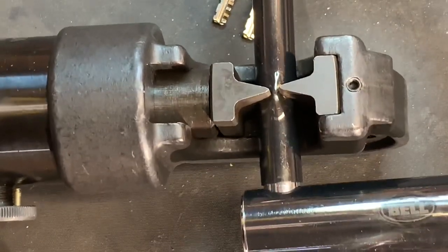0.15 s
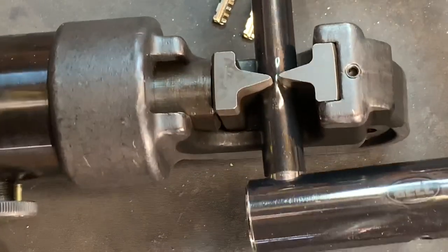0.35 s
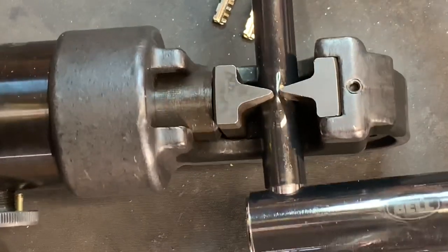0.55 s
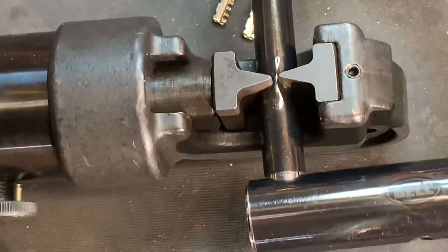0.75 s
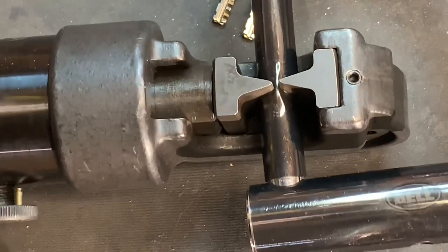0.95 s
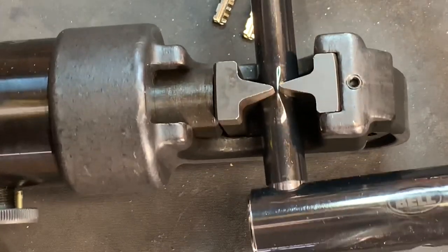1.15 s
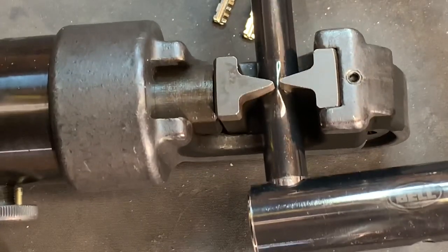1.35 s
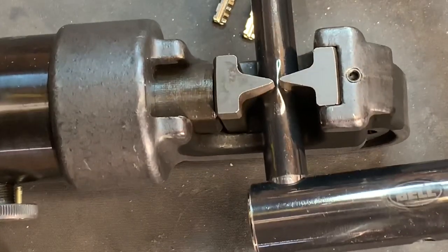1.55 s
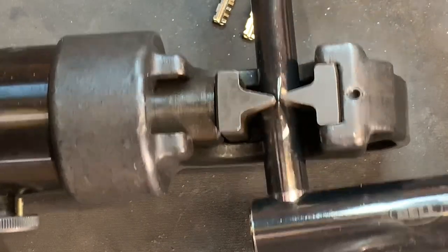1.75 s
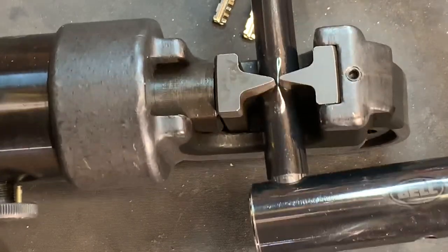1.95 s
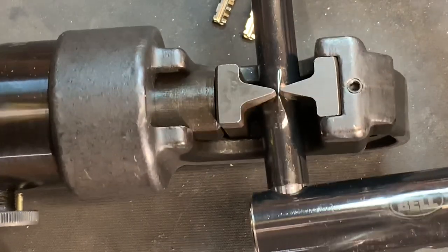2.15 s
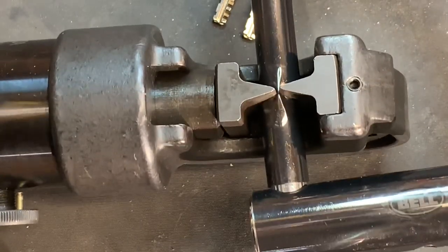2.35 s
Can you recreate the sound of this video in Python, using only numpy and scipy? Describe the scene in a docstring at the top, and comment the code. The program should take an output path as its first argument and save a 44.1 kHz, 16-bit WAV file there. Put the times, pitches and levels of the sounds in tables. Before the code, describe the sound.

Close at a garage workbench, a pump handle clicks, steel chinks, and a deafening crack overloads the microphone; metal rings, the room answers roughly, then two quieter strokes end in solid knocks over faint hum.

```python
"""Faint hum and a small tick, then the click of a pump handle, heard close by at a garage workbench.
A hand-pumped hydraulic cutter bites a hardened steel shackle: the steel chinks, then cracks loudly enough
to overload the microphone, and the bench jolts. Two more strokes follow, each ending in a knock.
Struck metal and the bench are sums of dying sine modes; clacks, blast and thuds are noise bursts whose
bands die at their own speeds; oil, rubbing, air and rumble are steadily coloured noise."""
import sys
import numpy as np
from scipy import signal
from scipy.fft import rfft, irfft
from scipy.io import wavfile

SR = 44100
rng = np.random.default_rng(int(sys.argv[2]) if len(sys.argv) > 2 else 0)


def transcribe(signal):
    """Save signal, clipped to [-1, 1], as a 16-bit WAV file at the path in sys.argv[1]."""
    frames = np.atleast_2d(signal).T
    limited = np.clip(frames, -1, 1)
    pcm = np.round(limited * 32767).astype(np.int16)
    wavfile.write(sys.argv[1], SR, pcm)


N = 105840  # samples, 2.4 s

# The handle lands at the end of a stroke: start_s, level_db
KNOCKS = [(1.0275, -3), (1.7311, -1.5)]
CRACK_S = 0.2311  # the shackle breaks


def amp(db):
    """Decibels to gain."""
    return 10 ** (np.asarray(db) / 20)


def add(mix, s, sound):
    """Lays a sound into the mix at time s, in place."""
    part = mix[max(round(s * SR), 0):][:len(sound)]
    part += sound[:len(part)]


def read(points, hz, column=1):
    """Reads a table on a log-frequency axis."""
    rows = np.array(points, float)
    return np.interp(np.log(hz + 1), np.log(rows[:, 0]), rows[:, column])


def decay(t, t60):
    """A gain that falls by 60 dB in t60 seconds."""
    return np.exp(-np.log(1000) * t / t60)


def rise(rise_s):
    """One second of gain that climbs from 0 towards 1 with the given time constant."""
    return 1 - np.exp(-np.arange(SR) / SR / rise_s)


def noise(colour):
    """Steady noise of a given colour, rms 1."""
    gain = amp(read(colour, np.fft.rfftfreq(N, 1 / SR)))
    x = irfft(rfft(rng.standard_normal(N)) * gain, N)
    return x / x.std()


def waver(rate_hz, depth_db):
    """A gain that wanders at random, mostly slower than the given rate."""
    smoothing = (1 + (np.fft.rfftfreq(N, 1 / SR) / rate_hz) ** 2) ** 2
    x = irfft(rfft(rng.standard_normal(N)) / smoothing, N)
    return amp(depth_db * x / x.std())


def burst(colour, rise_cycles=0.85, count=24):
    """One second of noise, rms 1 before shaping: each band swells in about a cycle and dies at its own speed."""
    t, hz = np.arange(SR) / SR, np.fft.rfftfreq(SR, 1 / SR)
    spectrum = np.exp(2j * np.pi * rng.random(len(hz))) * amp(read(colour, hz))
    spectrum /= irfft(spectrum, SR).std()
    centres = np.geomspace(30, 16000, count)
    # triangular bands that overlap and sum to one
    weights = np.array([np.interp(hz, centres, row) for row in np.eye(count)])
    bands = irfft(spectrum * weights, SR)
    swell = 1 - np.exp(-t * centres[:, None] / rise_cycles)
    fade = decay(t, read(colour, centres, column=2)[:, None])
    return (bands * swell * fade).sum(0)


def ring(modes, scatter=1):
    """One second of dying modes; scatter 0 starts them all together, as one push does."""
    t = np.arange(SR) / SR
    return sum(amp(db) * decay(t, t60) * np.sin(2 * np.pi * (hz * t + scatter * rng.random()))
               for hz, db, t60 in modes)


def shimmer(modes, spread, count=12):
    """Each mode split into a cluster of close, beating lines; spread is a share of its frequency."""
    lines = [(hz * (1 + spread * rng.standard_normal()), db, t60)
             for hz, db, t60 in modes for _ in range(count)]
    return ring(lines) / np.sqrt(count)


def push(modes, rise_s):
    """Low modes set swinging by a soft push."""
    return -ring(modes, scatter=0) * rise(rise_s)


def garage(x, wet_db):
    """Adds the short tail of the room: the sound convolved with dying noise of unit energy."""
    # Room tail: pitch_hz, relative_level_db, t60_s
    room = [(160, -7.5, 0.26), (500, 2, 0.45), (4500, -9.5, 0.42), (15000, -12.5, 0.45)]
    tail = burst(room) * rise(0.0021)
    return x + amp(wet_db) * signal.fftconvolve(x, tail / np.linalg.norm(tail))[:N]


def background():
    """Room air and low rumble as coloured noise, and mains hum as sines whose levels waver."""
    # Colours of the air and of the rumble: pitch_hz, relative_level_db
    air_colour = [(88, -20), (150, -4.5), (360, -4), (473, -6), (600, -12), (1820, -20.5), (6440, -22),
                  (15800, -33.5)]
    rumble_colour = [(10, 3), (25, 4.5), (50, -9), (80, -15), (130, -19.5), (220, -37), (600, -59.5)]
    # Course of the rumble's rms: time_s, level_db
    rumble_course = [(0, -36), (.12, -31.5), (.6, -41), (2.3, -44.5)]
    # Mains hum, rms before it wavers: pitch_hz, level_db
    hum_lines = [(119.6, -65.5), (360, -70.5), (480, -73.5), (600, -75.5), (721, -83)]
    t = np.arange(N) / SR
    air = amp(-61.5) * noise(air_colour)
    rumble = amp(np.interp(t, *np.transpose(rumble_course))) * noise(rumble_colour)
    hum = np.zeros(N)
    for hz, db in hum_lines:
        sine = np.sqrt(2) * np.sin(2 * np.pi * (hz * t + rng.random()))
        hum += amp(db) * waver(rate_hz=9, depth_db=4.5) * sine
    return air + rumble + hum


def rubbing():
    """Faint friction as the handle is moved: coloured noise under a bell-shaped swell."""
    # Rubs: middle_s, half_length_s, peak_level_db
    rubs = [(2.337, 0.12, -60)]
    # Colour of the friction: pitch_hz, relative_level_db
    rub_colour = [(400, 8.5), (1000, 4.5), (15500, -8.5)]
    t = np.arange(N) / SR
    swells = sum(amp(db) * np.exp(-((t - s) / half) ** 2) for s, half, db in rubs)
    return noise(rub_colour) * swells


def oil(edge_s=0.0075):
    """Oil hisses through the valve while the handle comes down: noise with short sloping edges."""
    # Hisses: start_s, length_s, level_db
    hisses = [(0.122, 0.088, -54.5), (0.954, 0.08, -58), (1.676, 0.075, -59.5)]
    # Colour of the hiss: pitch_hz, relative_level_db
    hiss_colour = [(300, -15), (2800, 4.5), (4600, 3), (6000, -4), (10000, -22), (15500, -13.5)]
    t = np.arange(N) / SR
    flow = np.zeros(N)
    for s, length, db in hisses:
        to_nearest_edge = np.minimum(t - s, s + length - t)
        flow += amp(db) * np.clip(to_nearest_edge / edge_s, 0, 1)
    return noise(hiss_colour) * flow


def loose_metal():
    """A loose piece hops on the bench after each jolt; its ring builds up unevenly as it chatters."""
    # Rattles: start_s, tap_db, ring_db
    rattles = [(.286, -29, -9.5), (1.0755, -24.5, -37), (1.088, -35, -37.5), (1.7785, -27.5, -40),
               (1.790, -34, -39.5)]
    # Noise of the tap: pitch_hz, relative_level_db, t60_s
    tap_colour = [(372, 6.5, 0.11), (680, -2.5, 0.12), (1100, -9.5, 0.11), (1600, -19.5, .14),
                  (2527, -19.5, 0.11), (12000, -42.5, 0.06)]
    # Modes of the loose piece: pitch_hz, relative_level_db, t60_s
    loose_modes = [(1168, 0, .22), (1200, -8, .12), (1286, -13, .16), (2053, -21, .16)]
    out = np.zeros(N)
    swell = rise(0.04)
    for s, tap_db, ring_db in rattles:
        chatter = waver(rate_hz=150, depth_db=1.8)[:SR]
        tap = amp(tap_db) * burst(tap_colour, rise_cycles=0.3)
        add(out, s, tap + amp(ring_db) * swell * chatter * ring(loose_modes))
    return garage(out, wet_db=-24)


def bench(lag_s=0.00097, sway_lag_s=0.0045, rebound_s=0.128):
    """The bench thumps under each knock and the tool's kick; its frame sways and settles back."""
    # Modes of the bench and of its swaying frame: pitch_hz, relative_level_db, t60_s
    bench_modes = [(114.6, -5, 0.11), (116, -30.5, 0.51), (224, -27, 0.38), (342, -38.5, .3),
                   (392, -37, 0.33)]
    sway_modes = [(43, -10.5, .12), (46.7, -28, 0.66)]
    # Noise of the thud: pitch_hz, relative_level_db, t60_s
    thud_colour = [(40, -1, 0.41), (123.4, 5, 0.31), (450, -5, 0.16), (620, -16.5, .23), (970, -12.5, 0.19),
                   (1400, -29, 0.15), (8000, -57, .1)]
    out = np.zeros(N)
    swing = push(bench_modes, rise_s=0.0044)
    sway = push(sway_modes, rise_s=0.002)
    add(swing, sway_lag_s, -sway)
    add(swing, rebound_s, amp(-13.5) * sway)
    # the tool kicks at once as the steel breaks, then drops back on the bench
    jolts = [(CRACK_S, -5), (CRACK_S + 0.0225, 6.5)]
    for s, db in KNOCKS + jolts:
        add(out, s + lag_s, amp(db) * (swing + amp(-19.5) * burst(thud_colour)))
    return out


def handle():
    """The handle clicks and bumps at the top, ticks in its joints and knocks at the bottom."""
    # Handle at the top of its travel: click_s, click_db, bench_bump_s, bump_db
    lifts = [(0.0466, -30, .0575, -20), (0.863, -30.5, .871, -22.5), (1.5616, -28, 1.5683, -21.5)]
    # Small ticks of play in the linkage: start_s, level_db
    ticks = [(.033, -50), (.558, -51), (.6024, -51), (0.843, -50), (1.3675, -49), (1.5397, -49)]
    # Noise of click, tick and clack: pitch_hz, relative_level_db, t60_s
    click_colour = [(800, -1.5, 0.028), (1300, -9, 0.062), (3000, -2, .04), (5500, -8.5, 0.044),
                    (8000, -1, .03), (15500, -12, 0.027)]
    tick_colour = [(1210, -3.5, .03), (4460, 0, .04), (14875, -25.5, .02)]
    clack_colour = [(830, 12.5, 0.035), (1520, -4.5, 0.23), (2430, 9, 0.016), (4870, -3, 0.092),
                    (5900, -5, 0.18), (10400, -3, 0.03), (15500, -24, .015)]
    # Modes of linkage, bench bump and end stop: pitch_hz, relative_level_db, t60_s
    linkage_modes = [(3073, -5.5, 0.057), (7913, -10.5, 0.021), (790, -15, 0.047)]
    bump_modes = [(115.74, 3, 0.08), (145, 1, 0.096)]
    stop_modes = [(2596, 2.5, 0.028), (4540, -0.5, 0.014), (5140, -4.5, 0.041)]
    out = np.zeros(N)
    for s, click_db, bump_s, bump_db in lifts:
        add(out, s, amp(click_db) * (burst(click_colour) + ring(linkage_modes)))
        add(out, bump_s, amp(bump_db) * push(bump_modes, rise_s=0.0036))
    for s, db in ticks:
        add(out, s, amp(db) * burst(tick_colour))
    for s, db in KNOCKS:
        add(out, s, amp(db - 29.5) * (burst(clack_colour) + ring(stop_modes)))
    return garage(out, wet_db=-11.5)


def chinks(rise_s=0.0012, high_ring_from_hz=8500):
    """Steel slips on steel and rings; the contact favours low modes, or high modes and a bright skid."""
    # Shifts of the steel: start_s, low_ring_db, high_ring_db, contact_noise_db
    shifts = [(0.0681, -30, -25, -28.5), (0.0857, -35, -17, -28.5), (0.1081, -27.5, -21.5, -22.5),
              (0.444, -48.5, -42.5, -44.5), (.6612, -67, -47.5, -69.5), (0.878, -36.5, -52, -34.5),
              (0.935, -60.5, -50, -55), (1.043, -65, -34.5, -42), (1.058, -68, -42, -50),
              (1.743, -56, -33, -37.5), (1.8505, -74, -54.5, -57.5)]
    # Modes of the steel parts: pitch_hz, relative_level_db, t60_s
    steel_modes = [(2848, -16, .25), (5130, -16, .17), (7235, -1, .15), (10030, -2.5, .055),
                   (11720, -12, .06), (12480, -14, .07), (15200, -9, .05)]
    # Noise of the contact and of the skid: pitch_hz, relative_level_db, t60_s
    contact_colour = [(1490, -6, .06), (3200, 1.5, 0.058), (5060, -4.5, 0.064), (5860, -10.5, .05),
                      (7900, -13, 0.1), (15500, -15, .03)]
    skid_colour = [(4000, -30, .03), (9000, -1.5, .04), (11500, -2, 0.1), (13800, -7, .04), (15500, 1, .04)]
    out = np.zeros(N)
    swell = rise(rise_s)
    for s, low_db, high_db, contact_db in shifts:
        modes = [(hz, db + (high_db if hz > high_ring_from_hz else low_db), t60)
                 for hz, db, t60 in steel_modes]
        contact = amp(contact_db) * burst(contact_colour)
        skid = amp(high_db - 6.5) * burst(skid_colour)
        add(out, s, swell * (shimmer(modes, spread=0.007) + contact + skid))
    return garage(out, wet_db=-13)


def crack():
    """The shackle fractures: a blast, ringing steel and the room's rough answer."""
    # Noise of the blast and of the room's answer: pitch_hz, relative_level_db, t60_s
    blast_colour = [(100, -3.5, .1), (1000, -6.5, 0.16), (4000, 5, .11), (5500, -2.5, 0.12),
                    (7500, 4, 0.078), (10000, 0, .1), (16600, -8.5, 0.056)]
    answer_colour = [(100, 6.5, .5), (270, -2.5, 0.45), (480, 4, .39), (1500, -4.5, .41),
                     (4000, -1.5, .385), (5570, -5, 0.4), (8000, -2.5, 0.26), (15500, -17, 0.33)]
    # Modes of the broken steel: pitch_hz, relative_level_db, t60_s
    fracture_modes = [(3824, -8, .26), (4004, -11, .26), (4344, -9, .27), (4694, -12, .22),
                      (6659, -15, .33), (6828, -7, .17), (7080, -5, .31), (7106, -6, .3), (7216, -3, .26),
                      (7287, -6, .24), (8845, -11, .25), (10924, -7, .2)]
    out = np.zeros(N)
    blast = amp(1) * burst(blast_colour)
    roughness = waver(rate_hz=260, depth_db=2.3)[:SR]
    answer = amp(-8.5) * burst(answer_colour) * roughness
    add(out, CRACK_S, blast + answer + amp(-9.5) * ring(fracture_modes))
    return out


def scene():
    """All sources at one microphone."""
    surroundings = background() + rubbing() + oil() + loose_metal() + bench()
    return (surroundings + handle() + chinks() + crack())[None]


def record(dry):
    """The microphone overloads, bending peaks smoothly towards full scale; then a steep treble cut."""
    limited = dry / (1 + dry ** 6) ** (1 / 6)
    low_pass = signal.firwin(511, 15850, window=("kaiser", 7), fs=SR)  # cutoff in Hz
    return signal.oaconvolve(limited, low_pass[None], "same")


dry = scene()
out = record(dry)
transcribe(out)
```